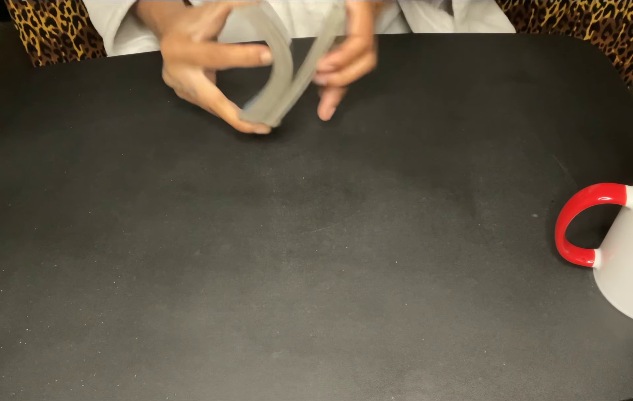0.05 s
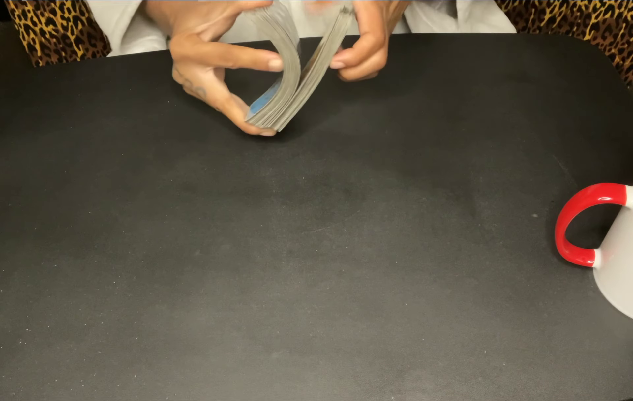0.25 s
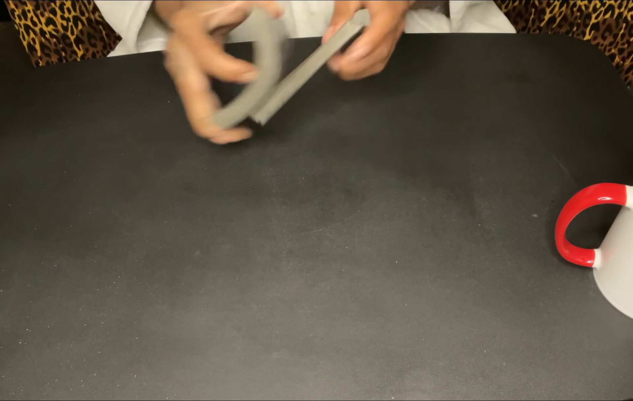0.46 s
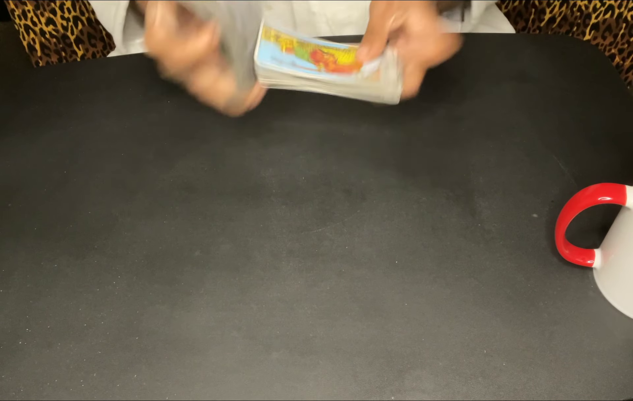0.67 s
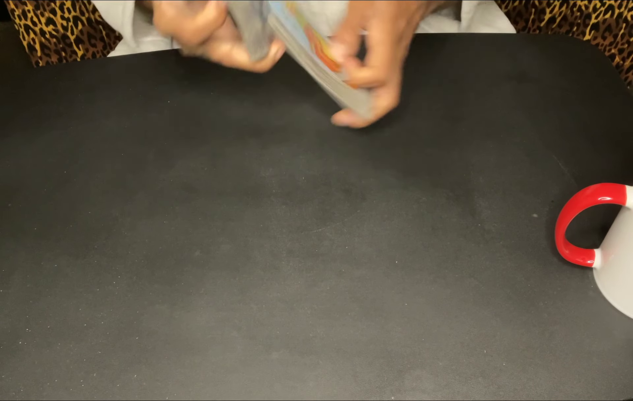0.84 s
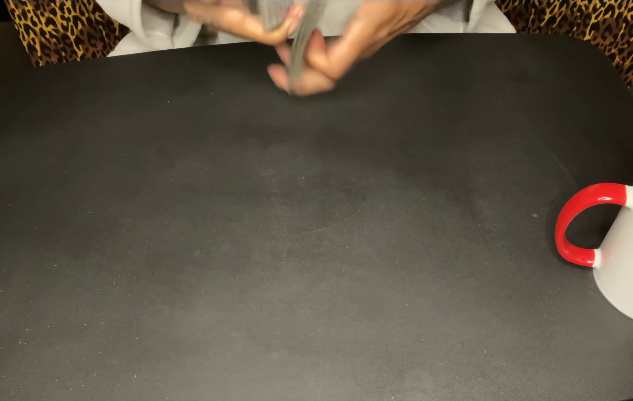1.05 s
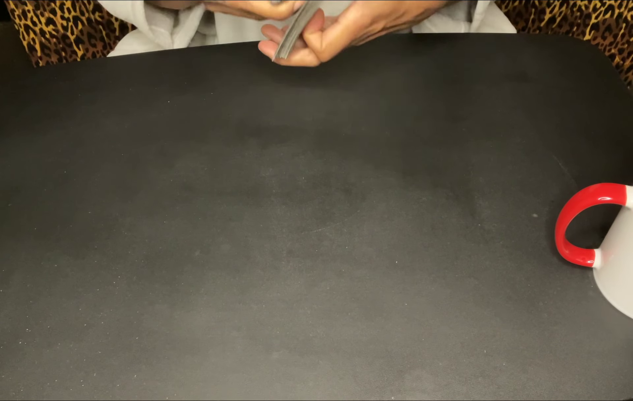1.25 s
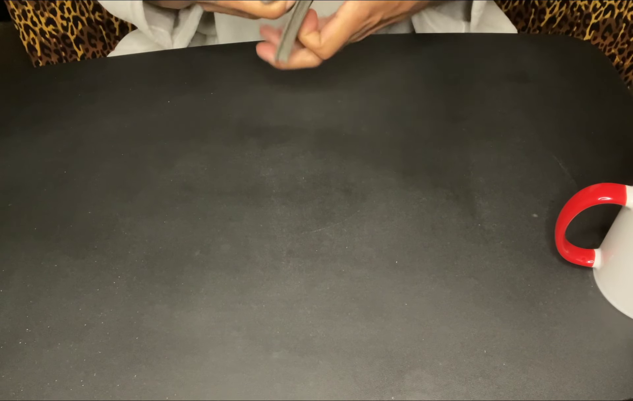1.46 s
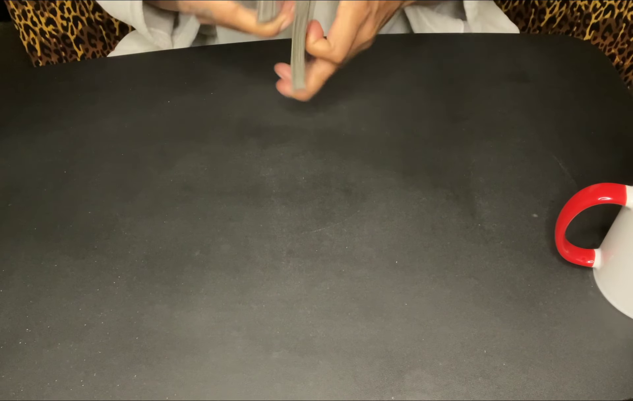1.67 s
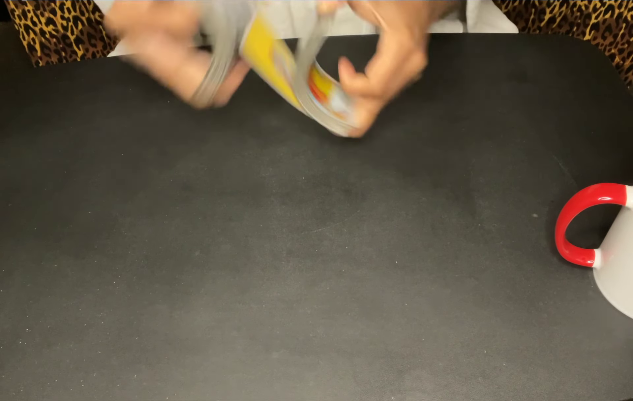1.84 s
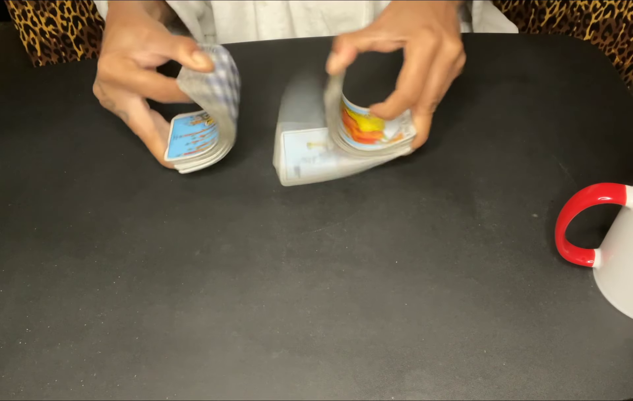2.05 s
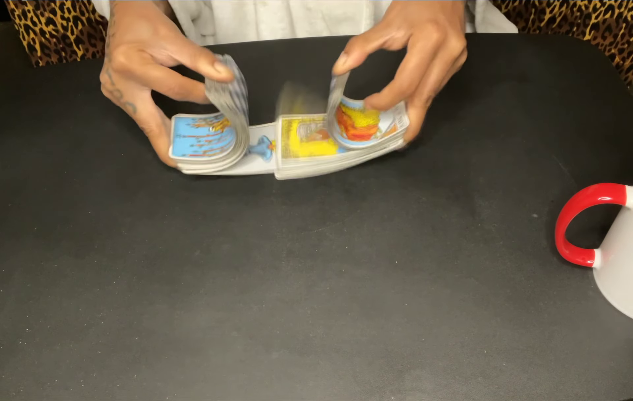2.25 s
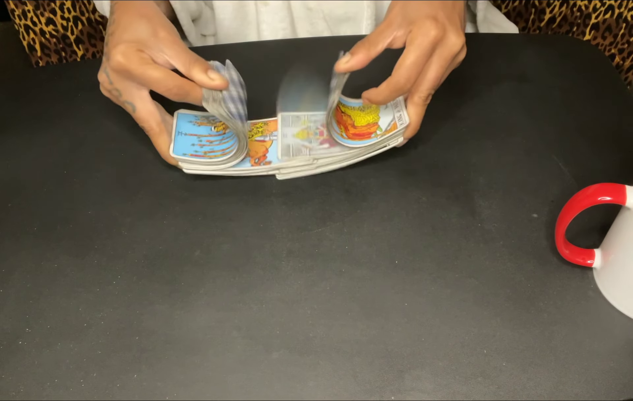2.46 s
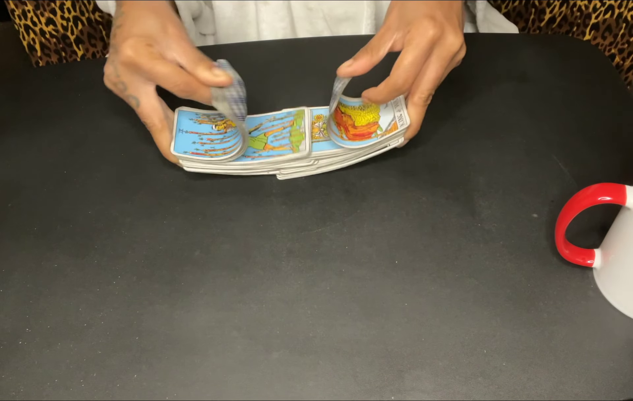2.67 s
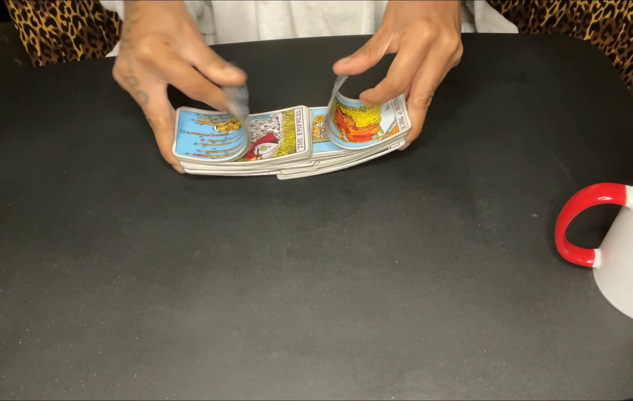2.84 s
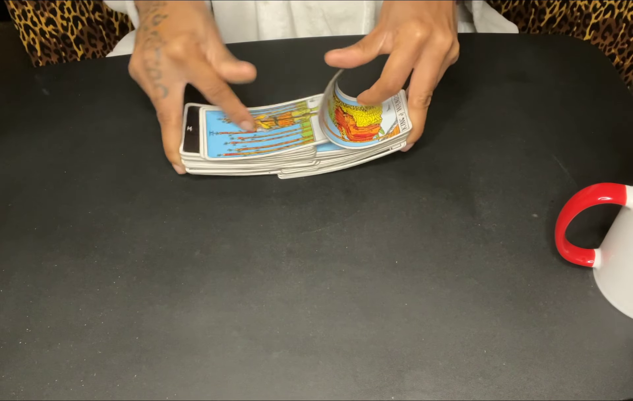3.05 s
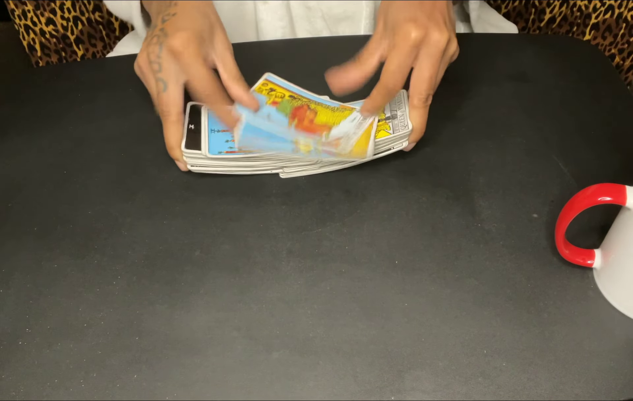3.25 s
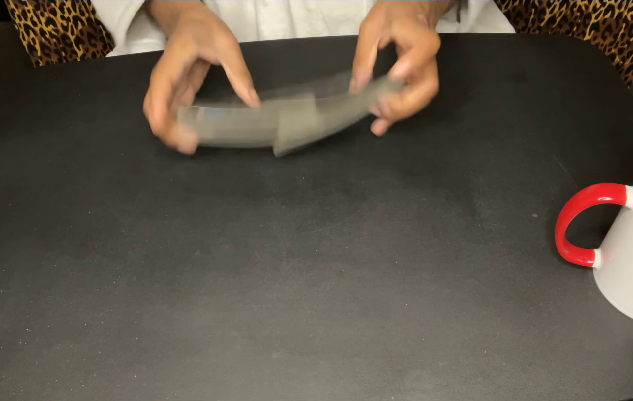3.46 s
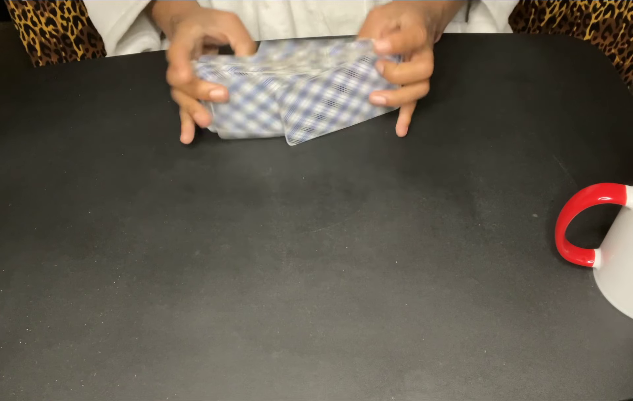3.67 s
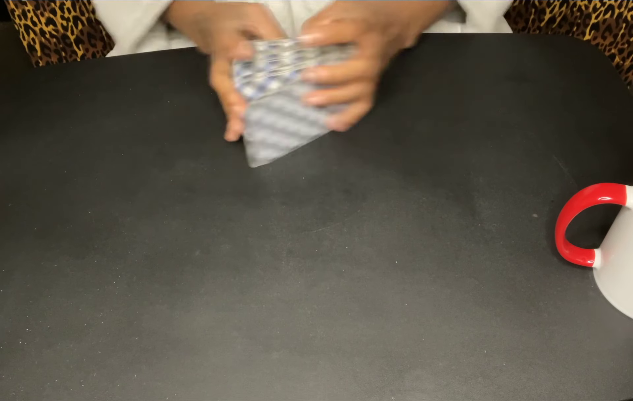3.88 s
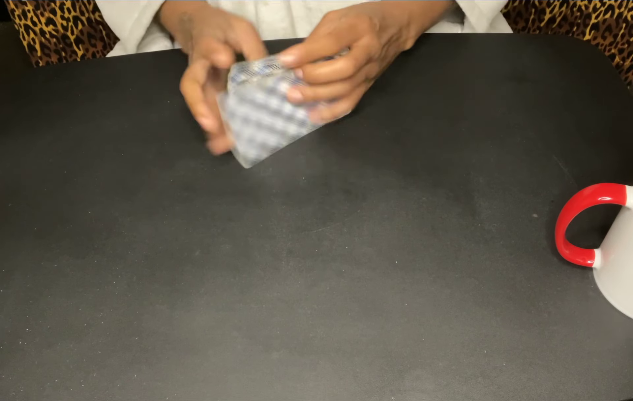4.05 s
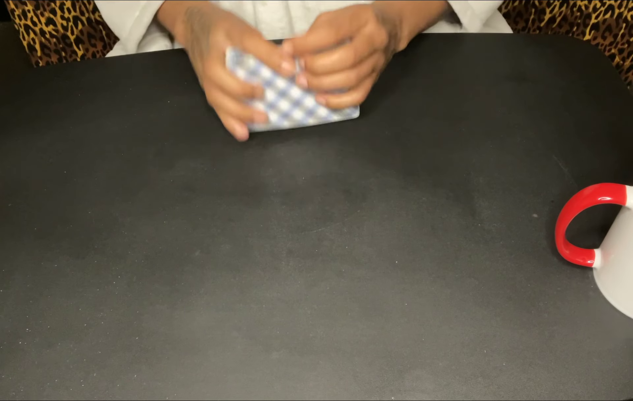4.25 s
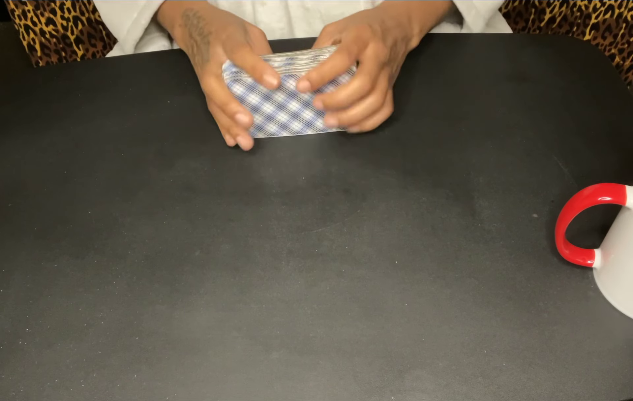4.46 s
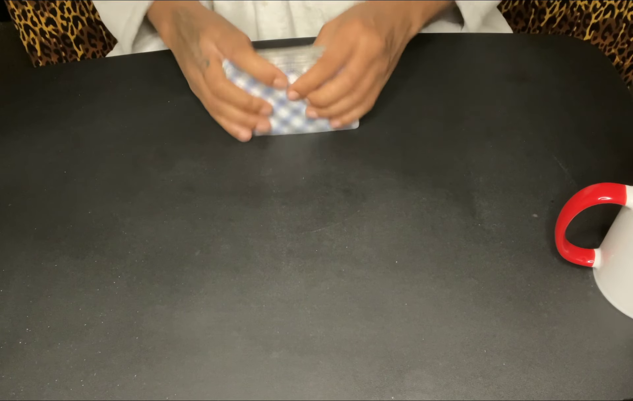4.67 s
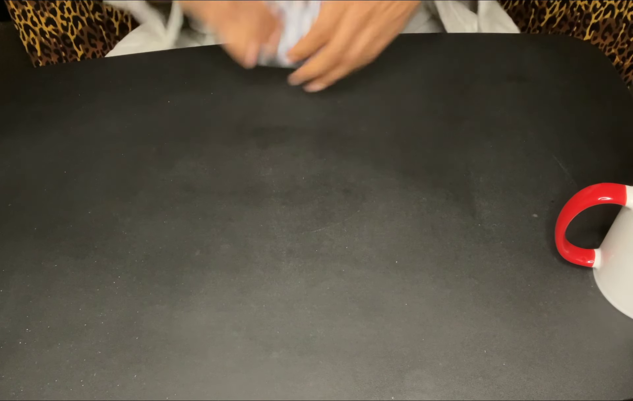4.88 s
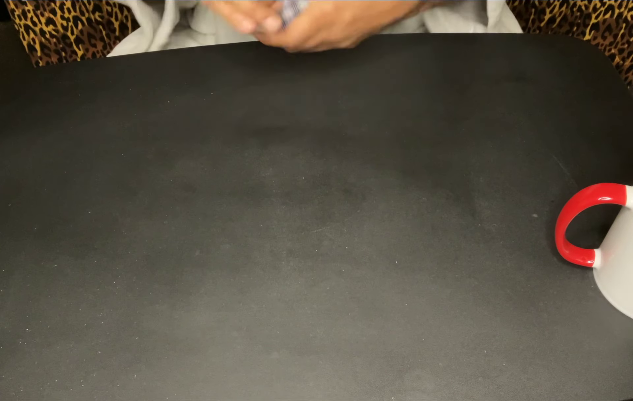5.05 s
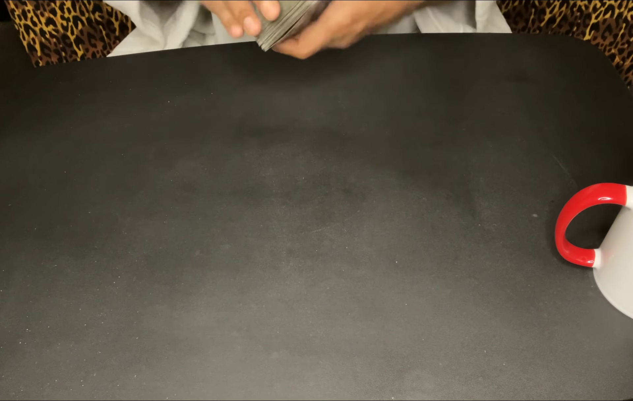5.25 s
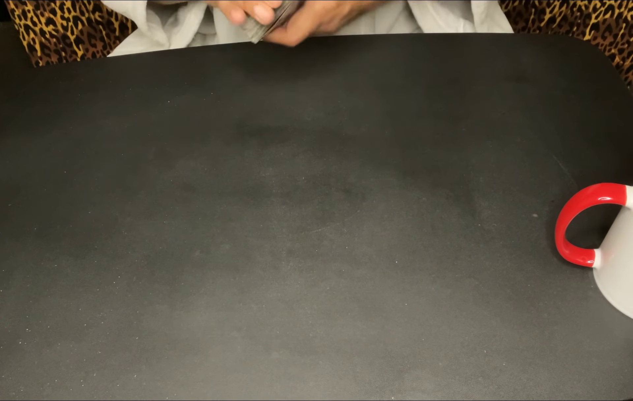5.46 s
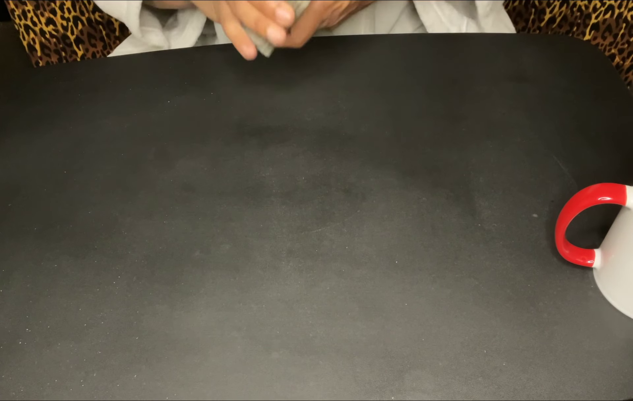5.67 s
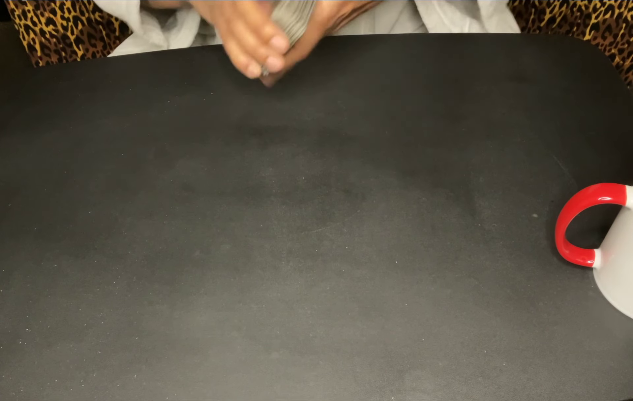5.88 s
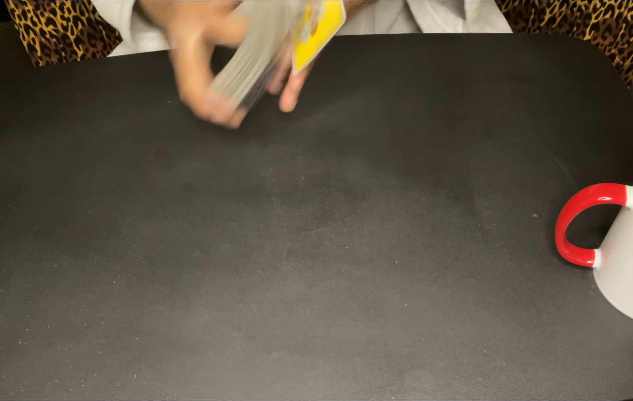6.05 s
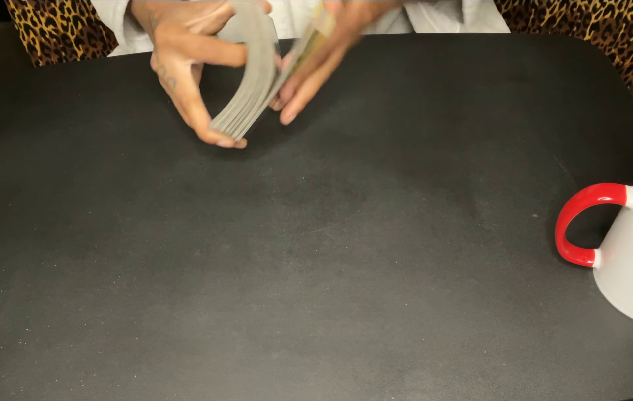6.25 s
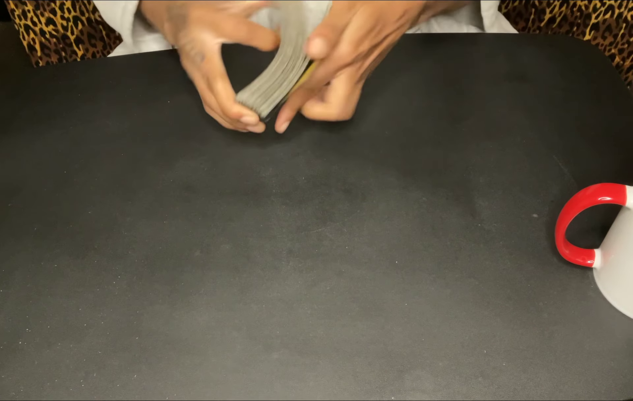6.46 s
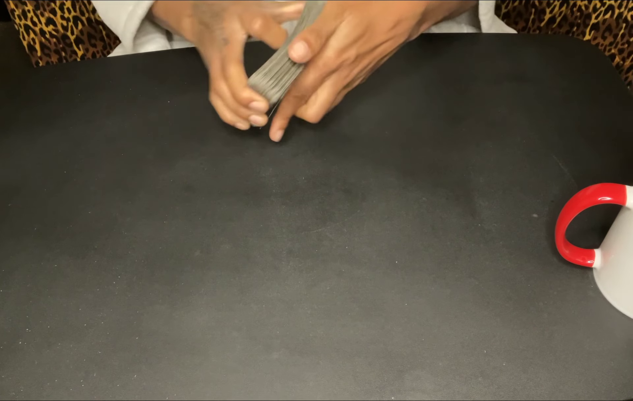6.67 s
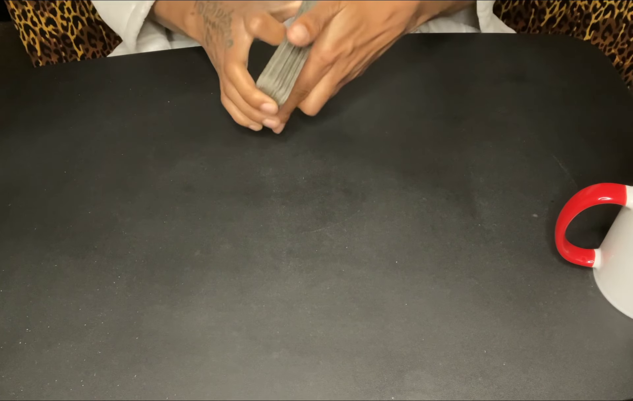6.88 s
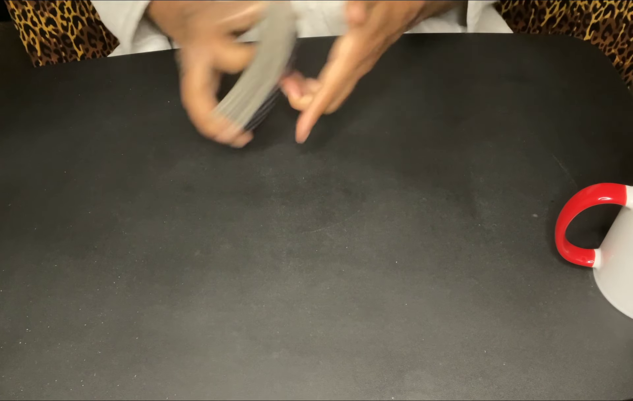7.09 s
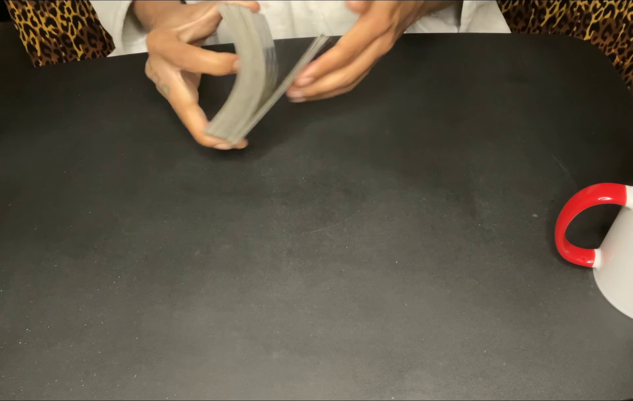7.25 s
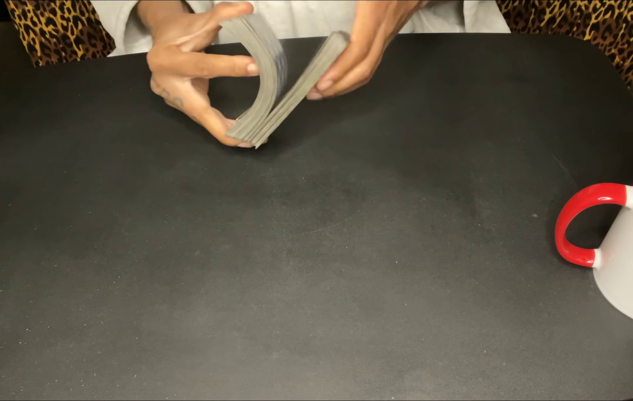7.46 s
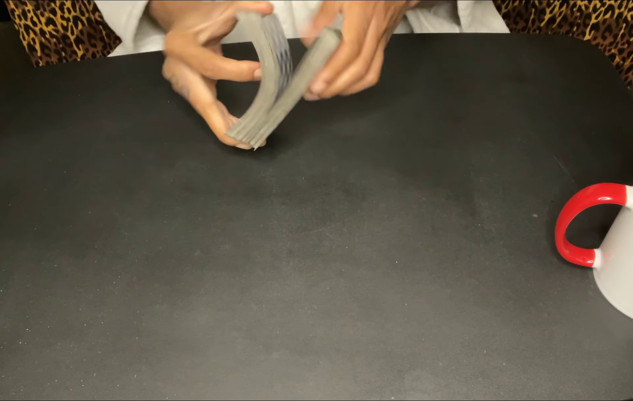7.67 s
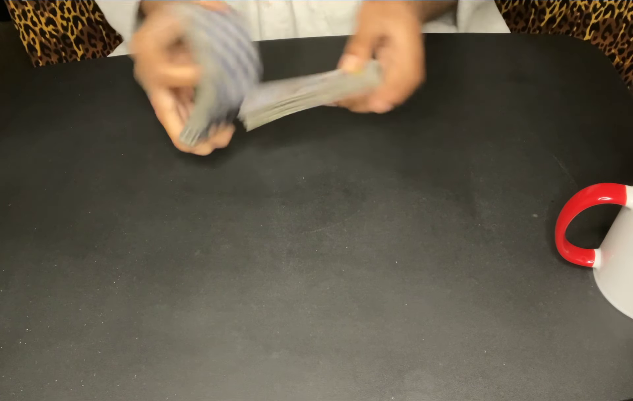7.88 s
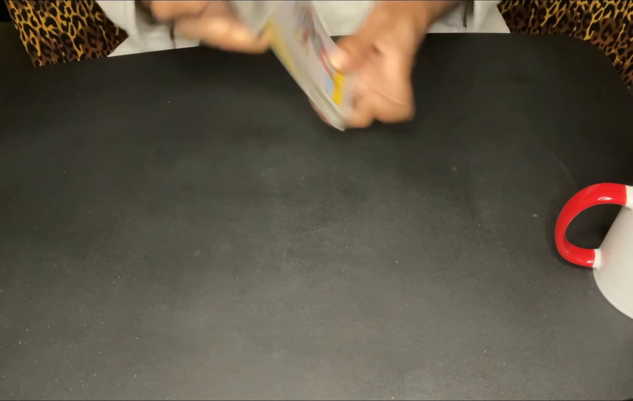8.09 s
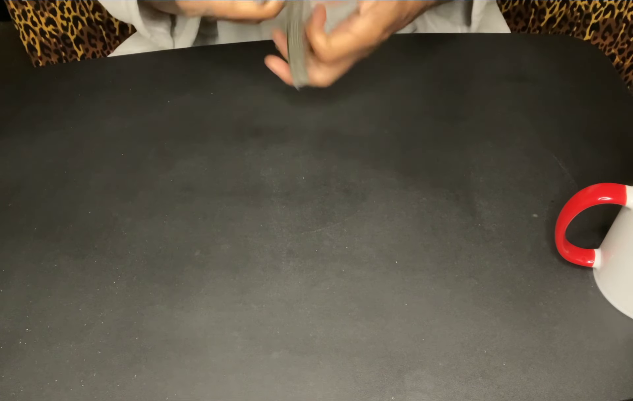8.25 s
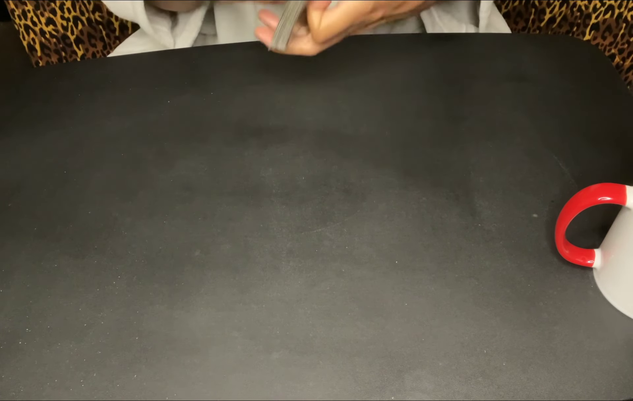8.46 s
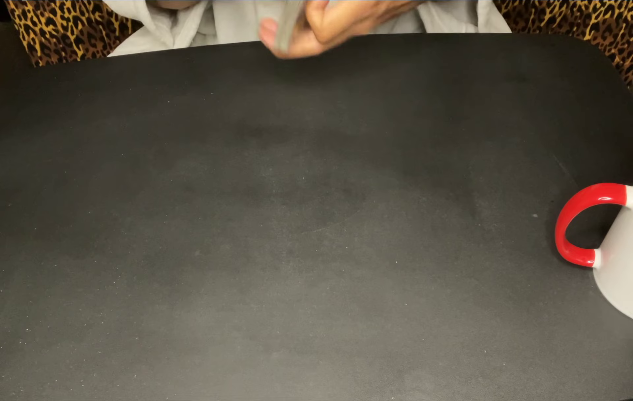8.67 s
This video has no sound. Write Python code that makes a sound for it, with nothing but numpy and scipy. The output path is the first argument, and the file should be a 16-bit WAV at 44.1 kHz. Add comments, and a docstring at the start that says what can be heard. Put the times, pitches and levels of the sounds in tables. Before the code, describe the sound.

Close, nearly centred sound of a large stiff card deck in a small quiet room, over a faint low rush of air and barely audible hum. At 0-0.15 s a few cards flick off the thumb with springy, hollow pops; faint grainy rubbing follows until about 1.8 s. From 2.0 to 3.2 s the halves riffle together in irregular, bright snaps, flat slaps and deep table thumps, loudest and distorted at 2.15-2.8 s, then lighter. At 3.58-3.8 s a bridge collapses in a rapid soft flutter of airy puffs and ticks, with a few stragglers and scraping slides to 4.25 s. At 4.4 s tightly bunched packets knock the table in one dull, ringing thud. Soft slides follow, near quiet from 5 s. Flicks return around 6.1-6.25 s and, in a looser run, 7.2-7.5 s, with hollow pops and crisp ticks. Faint rustling fades near 8.5 s.

```python
"""A deck of large, stiff cards is shuffled just above a table, close to a microphone in a small quiet room.
First the thumb flicks cards into the other hand, each ringing in its bend; faint strokes of grainy friction follow.
The halves riffle together with loud, overloading snaps, slaps and table thumps; a bridge collapses in puffs of air
and ticks, and packets knock square with a ringing thud. Cards slide in the hands, and the deck is split again.
Filtered impulses make the blows, coloured noise the friction and the steady air; faint wavering sines hum below."""
import sys
import numpy as np
from scipy import signal
from scipy.fft import rfft, irfft, next_fast_len
from scipy.io import wavfile
from scipy.ndimage import map_coordinates

SR = 44100
rng = np.random.default_rng(int(sys.argv[2]) if len(sys.argv) > 2 else 0)


def to_wav(sig):
    """Store sig (one row per channel, or 1-D mono) as 16-bit WAV at the path in sys.argv[1].

    Samples outside -1..1 are clipped; the rate is SR.
    """
    pcm = np.clip(np.atleast_2d(sig), -1, 1) * 32767
    pcm = np.round(pcm).astype(np.int16)
    wavfile.write(sys.argv[1], SR, pcm.T)  # frames by channels


N = 384552
SIZE = 16384  # samples in one blow or room response
T = np.arange(SIZE) / SR
HZ = np.fft.rfftfreq(SIZE, 1 / SR)

# cards riffled onto the table, levels as rms over 5 ms; the landing level is the one before cushioning:
# (t/s, ring level/dB, ring f/Hz, ring prominence level/dB, edge crack level/dB, landing level/dB)
RIFFLE_SNAPS = [(2.0153, -27, 4170, 6.5, -35, -29), (2.0552, -36, 741, 12.5, -49, -41),
                (2.0711, -29.5, 2500, 5, -36, -42.5), (2.0737, -17.5, 3400, 2.5, -22.5, -21),
                (2.134, -33, 850, 0.5, -36, -33.5), (2.1521, -7, 1890, 2.5, -24.5, -12),
                (2.178, -36, 2070, 9, -25, -30.5), (2.2017, -5, 2620, 19.5, -14.5, -7.5),
                (2.2674, -14, 2420, 10, -21, -15), (2.274, -8, 4900, 12.5, -13, -7),
                (2.3653, -12, 2004, 15, -13.5, -12), (2.4385, -6.5, 4530, 8.5, -10.5, -26.5),
                (2.4504, -8.5, 1390, 9.5, -10.5, -10), (2.476, -9, 2720, 12.5, -9, -23),
                (2.5141, -13.5, 4770, 12.5, -22, -24.5), (2.5702, -7, 2040, 6.5, -9.5, -16),
                (2.6164, -9.5, 1700, 3, -15.5, -28.5), (2.6275, -17, 4640, 5.5, -29.5, -17.5),
                (2.6677, -9.5, 2260, 5, -12, -11), (2.7735, -29, 2500, 3.5, -35.5, -45.5),
                (2.7782, -9, 1640, 6.5, -34.5, -19), (2.7877, -13, 3300, 7, -16.5, -19.5),
                (2.906, -17, 2940, 0.5, -28.5, -27), (2.9254, -22.5, 765, 27, -27, -29),
                (2.9304, -19, 4730, 11, -39, -27.5), (2.9725, -28, 3420, 7, -28.5, -59),
                (2.9872, -21.5, 3240, 3, -27, -28), (3.0025, -24.5, 6000, 12, -32, -28),
                (3.0212, -25.5, 2700, 2, -26.5, -41), (3.1078, -25.5, 1770, -3, -44, -49),
                (3.1148, -16.5, 3400, 9, -15, -29.5), (3.1369, -27, 2050, 5, -29.5, -43.5),
                (3.197, -32.5, 2460, 12, -36, -59), (3.2078, -34, 3670, 6, -34, -46.5)]
# colour of a card's bend: (f/Hz, level/dB per Hz)
CARD_BEND = [(100, -25.5), (250, -11.5), (500, -6), (900, -0.5), (1600, 5.5), (2500, 4), (3500, 1.5),
             (5000, -8), (8000, -24), (16000, -44)]
# colour of a flat slap: (f/Hz, level/dB per Hz)
SLAP_COLOUR = [(30, -39.5), (100, -17), (250, -6), (450, -1), (700, -3.5), (1100, -17), (3000, -35.5)]
# colour of the thump passed to the table: (f/Hz, level/dB per Hz)
THUMP_COLOUR = [(25, -42), (50, -20.5), (85, -7), (130, -1.5), (200, -7), (280, -10.5), (450, -23),
                (1000, -51)]
CUSHION_DB_PER_S = 4  # the growing pile softens the slap
THUMP_DB, THUMP_DB_PER_S = -8.5, 6  # thump relative to the landing; it grows with the weight of the pile


def riffle():
    """Impact: each card snaps off the thumb, slaps the growing pile and thumps the table under it."""
    out = np.zeros((2, N))
    for s, ring_db, hz, lift_db, crack_db, landing_db in RIFFLE_SNAPS:
        elapsed = s - RIFFLE_SNAPS[0][0]
        slap_gain = amp(landing_db - CUSHION_DB_PER_S * elapsed)
        slap = slap_gain * contact(along(SLAP_COLOUR, HZ), t60=0.051, chatter=0.92)
        push = contact(along(THUMP_COLOUR, HZ), t60=0.11, chatter=1.4)
        thump_gain = amp(landing_db + THUMP_DB + THUMP_DB_PER_S * elapsed)
        thump = thump_gain * (push + amp(-0.5) * table_ring())
        release = snap(CARD_BEND, ring_db, hz, lift_db, crack_db)
        # the card hits the pile moving opposite to its first flick
        near, spread = release - slap + thump
        add(out, s, in_room(near, spread, wet_db=-8))
    return out


# cards flicked into the other hand as the deck is split:
# (t/s, ring level/dB, ring f/Hz, edge crack level/dB)
SPLIT_FLICKS = [(0.0054, -30, 920, -40.5), (0.03, -30, 870, -39), (0.0445, -30, 850, -50),
                (0.0625, -33, 756, -47), (0.0733, -16.5, 1010, -43), (0.1545, -13.5, 1670, -25.5),
                (0.7034, -54, 4500, -56), (1.787, -44.5, 866, -52), (1.9914, -39, 1250, -51.5),
                (6.0853, -43, 2980, -49), (6.1643, -27.5, 2510, -29.5), (6.1716, -25, 1037, -32),
                (6.2234, -49, 1216, -38.5), (6.2364, -47, 1600, -46), (6.5306, -47.5, 5000, -57),
                (7.2246, -41, 1050, -50), (7.2368, -31.5, 750, -41), (7.3126, -33, 3700, -42),
                (7.3399, -26.5, 785, -39.5), (7.3614, -31, 767, -52), (7.3728, -27, 790, -51),
                (7.3774, -34, 857, -41), (7.393, -27, 3500, -38.5), (7.4582, -19.5, 2570, -32),
                (7.4722, -32.5, 2494, -55), (7.5047, -33, 743, -44), (7.524, -27, 780, -44),
                (8.0111, -46, 914, -51.5)]
# ring of a card bent along its length: (f/Hz, level/dB per Hz)
LENGTHWISE_BEND = [(100, -29), (300, -11.5), (600, -1.5), (900, 3), (1300, -2.5), (2000, 0.5), (2750, -0.5),
                   (3300, -4), (5000, -12), (8000, -24), (16000, -37.5)]
SPLIT_LIFT_DB = 6  # how far that ring stands out at its own pitch
# pop of the cupped palm: pitch (Hz), level under a medium flick (dB), dB per dB of flick
PALM_HZ, PALM_DB, PALM_GROWS = 790, -36.5, 0.61
MEDIUM_DB = -30  # ring level of a medium flick


def splitting():
    """Cavity resonance: cards snap off the thumb into a cupped palm, which gives a hollow pop."""
    out = np.zeros((2, N))
    for s, ring_db, hz, crack_db in SPLIT_FLICKS:
        pop_colour = along(SLAP_COLOUR, HZ) + resonance(PALM_HZ, q=4.8, lift_db=11)
        pop = contact(pop_colour, t60=0.014, chatter=1.0)
        palm = amp(PALM_DB + PALM_GROWS * (ring_db - MEDIUM_DB)) * pop
        near, spread = snap(LENGTHWISE_BEND, ring_db, hz, SPLIT_LIFT_DB, crack_db) + palm
        add(out, s, in_room(near, spread, wet_db=-8.5))
    return out


# colour of a cracking card edge: (f/Hz, level/dB per Hz)
EDGE_CRACK = [(1500, -22), (3500, 1.5), (5000, 4.5), (8000, -1.5), (12000, -6), (16000, -16)]
# a freed card pulls a few neighbours after it: latest delay (s), greatest level (dB)
FOLLOW_S, FOLLOW_DB = 0.035, -20


def snap(bend, ring_db, hz, lift_db, crack_db, count=3):
    """Elastic release: a freed card cracks at its edge and rings in its bend; its neighbours slip after it."""
    ring_colour = along(bend, HZ) + resonance(hz, q=2.7, lift_db=lift_db)
    ring = amp(ring_db) * contact(ring_colour, t60=0.02, chatter=0.78)
    crack = amp(crack_db) * contact(along(EDGE_CRACK, HZ), t60=0.0079, chatter=6.5)
    sound = ring + crack
    for delay, size in rng.random((count, 2)):
        add(sound, FOLLOW_S * delay, amp(FOLLOW_DB) * size * (ring + crack))
    return sound


# modes of the table top: (f/Hz, level/dB, decay t60/s)
TABLE_MODES = [(86, -11, .25), (136, 3.5, 0.23), (166, -7.5, 0.2), (255, -9.5, 0.2), (313, -9.5, 0.31),
               (414, 4, 0.083), (487, -2, 0.34), (600, 1, 0.16), (737, -11, 0.089), (806, -4.5, .18)]


def table_ring(spread_db=2):
    """Modal superposition: the table's decaying modes add up, at new strengths for each blow."""
    hz, db, t60 = np.transpose(TABLE_MODES)[:, :, None]
    strength_db = db + spread_db * rng.standard_normal(db.shape)
    modes = amp(strength_db - 60 * T / t60) * np.sin(2 * np.pi * hz * T)
    return blow(np.sum(modes, 0))


# bent cards falling flat onto each other: (t/s, air puff level/dB, puff f/Hz)
FLAT_FALLS = [(3.5774, -21.5, 396), (3.5914, -17.5, 379), (3.6245, -18, 600), (3.6407, -17, 910),
              (3.6563, -18, 587), (3.6612, -23.5, 920), (3.6783, -14, 406), (3.6833, -19.5, 624),
              (3.7058, -22.5, 710), (3.7222, -19.5, 750), (3.7324, -20.5, 840), (3.7794, -27, 470),
              (3.9739, -31.5, 493), (3.9835, -28.5, 1740), (4.1962, -30, 416), (4.2104, -32, 280),
              (4.2471, -42, 477)]
# colour of the escaping air: (f/Hz, level/dB per Hz)
PUFF_COLOUR = [(50, -8), (150, 1), (350, 5.5), (800, 0), (1400, 0.5), (2300, -23), (6000, -56)]
# colour of card edges ticking and scraping: (f/Hz, level/dB per Hz)
EDGE_COLOUR = [(500, -38.5), (1200, 7), (2200, 4.5), (3200, 1), (3650, 6), (4100, -1.5), (6000, -11),
               (9000, -23), (16000, -38)]
# the edges tick hardest midway through the collapse, then more softly: (t/s, tick level/dB relative to the puff)
COLLAPSE_TICKS = [(3.6, -25), (3.655, -11), (3.69, -1.5), (3.8, -11)]


def bridge():
    """Air displacement: cards drop flat and squeeze out puffs of air; their edges tick."""
    out = np.zeros((2, N))
    for s, puff_db, hz in FLAT_FALLS:
        puff_colour = along(PUFF_COLOUR, HZ) + resonance(hz, q=2.0, lift_db=16.0)
        puff = amp(puff_db) * contact(puff_colour, t60=0.029, chatter=1.0)
        tick_db = puff_db + np.interp(s, *np.transpose(COLLAPSE_TICKS))
        tick = amp(tick_db) * contact(along(EDGE_COLOUR, HZ), t60=0.024, chatter=6.7)
        near, spread = puff + tick
        add(out, s, in_room(near, spread, wet_db=-5.5))
    return out


# packets of the deck landing edge-on on the table: (t/s, thud level/dB, edge clack level/dB)
PACKET_KNOCKS = [(4.3898, -13.5, -32), (4.3926, -12, -25.5), (4.3949, -18, -30), (4.3997, -16.5, -41),
                 (4.4043, -17.5, -27), (4.414, -43.5, -28)]
# colour of the thud: (f/Hz, level/dB per Hz)
THUD_COLOUR = [(30, -40), (70, -5), (140, 3), (260, 5), (410, -5), (600, -5), (800, -7), (1300, -6.5),
               (2200, -42), (5000, -39)]


def squaring_knock(table_db=-17):
    """Impulse excitation: the deck lands on its edge in packets; the first sets the table ringing."""
    out = np.zeros((2, N))
    for s, thud_db, clack_db in PACKET_KNOCKS:
        thud_colour = along(THUD_COLOUR, HZ) + resonance(417, q=2.5, lift_db=12)
        thud = amp(thud_db) * contact(thud_colour, t60=0.017, chatter=1.0)
        clack = amp(clack_db) * contact(along(EDGE_COLOUR, HZ), t60=0.029, chatter=3.8)
        near, spread = thud + clack
        add(out, s, in_room(near, spread, wet_db=-7.5))
    ring = amp(table_db) * table_ring()
    add(out, PACKET_KNOCKS[0][0], in_room(ring, ring, wet_db=-7.0))
    return out


# cards sliding lightly in the hands: (middle t/s, half length t/s, rub level/dB, hiss level/dB)
HAND_STROKES = [(0.47, 0.13, -66.5, -67), (0.711, 0.0091, -48, -69), (0.791, 0.0063, -55, -52),
                (0.823, 0.025, -55, -60), (0.96, 0.31, -66, -69.5), (1.405, 0.042, -64, -72),
                (1.83, 0.098, -60, -67.5), (3.35, 0.01, -52.5, -64), (3.52, 0.069, -60.5, -67),
                (3.865, 0.062, -43.5, -56), (4.633, 0.0017, -53.5, -57), (4.742, 0.029, -49.5, -73),
                (4.992, 0.009, -60, -57), (5.02, 0.13, -67.5, -68), (5.693, 0.003, -55, -63),
                (5.98, 0.065, -57, -61.5), (6.37, 0.054, -60, -63.5), (6.55, 0.15, -66.5, -75),
                (7.1, 0.1, -71.5, -79), (7.83, 0.074, -61, -60.5), (8.05, 0.14, -65, -67),
                (8.414, 0.028, -69.5, -59)]
# the woven halves pushed together: (middle t/s, half length t/s, air and table level/dB, edge scrape level/dB)
HALVES_PUSHED = [(3.64, 0.029, -26, -58), (3.73, 0.18, -40, -48.5), (3.88, 0.077, -35.5, -46),
                 (4.0, 0.027, -37, -51), (4.088, 0.017, -40, -35), (4.12, 0.092, -39.5, -49),
                 (4.22, 0.046, -44.5, -47), (4.735, 0.04, -43, -55.5)]
# colour of face rubbing on face: (f/Hz, level/dB per Hz)
RUB_COLOUR = [(300, -13.5), (800, -1), (2400, -1), (5000, -2), (8000, -12.5), (16000, -27)]
# colour of the faces' hiss: (f/Hz, level/dB per Hz)
HISS_COLOUR = [(2500, -17.5), (6000, -6), (9000, -3), (13000, -7), (16000, -14)]
# colour of the air pressed out between the halves, with the table humming along near 138 Hz:
# (f/Hz, level/dB per Hz)
AIR_AND_TABLE_COLOUR = [(50, -11), (105, -8), (138, 10), (180, -2), (300, 0.5), (550, 4), (1000, -3.5),
                        (1800, -40), (4000, -39)]
# the card edges sing faintly as they rub past each other: (f/Hz, level/dB per Hz)
SONG_COLOUR = [(2000, -51), (3350, -7), (3620, 9), (3900, -39), (6000, -50.5)]
PUSH_HISS_DB = -17  # hiss of the faces, relative to the scrape
# edges drag past the thumb around each snap: half length (s), level relative to the crack (dB)
DRAG_S, RIFFLE_DRAG_DB, SPLIT_DRAG_DB = 0.046, -27.5, -21.5
# the edge grates just before it lets go: how early (s), level relative to the crack (dB)
LEAD_S, LEAD_DB = 0.002, -20


def sliding(song_db=-13):
    """Stick-slip friction: grainy noise of cards and edges, with escaping air and the table humming along."""
    rub, hiss = swells(HAND_STROKES)
    air, scrape = swells(HALVES_PUSHED)
    drags = []
    for s, *_, crack_db, _ in RIFFLE_SNAPS:
        drags.append((s, DRAG_S, crack_db + RIFFLE_DRAG_DB))
        drags.append((s - LEAD_S, LEAD_S, crack_db + LEAD_DB))
    for s, *_, crack_db in SPLIT_FLICKS:
        drags.append((s, DRAG_S, crack_db + SPLIT_DRAG_DB))
    drag, = swells(drags)
    all_hiss = np.hypot(hiss, amp(PUSH_HISS_DB) * scrape)
    light = rub * noise(RUB_COLOUR, grain_db=3.5) + all_hiss * noise(HISS_COLOUR, grain_db=2.0)
    song = amp(song_db + 2.9 * wobble(25)) * noise(SONG_COLOUR)
    edges = scrape * (noise(EDGE_COLOUR, grain_db=3.0) + song)
    firm = air * noise(AIR_AND_TABLE_COLOUR, grain_db=2) + edges
    friction = light * amp(4.4 * wobble(45)) + firm + drag * noise(EDGE_CRACK, grain_db=6.5)
    return in_room(friction, friction, wet_db=-14)[:, :N]


# colour of the steady rush of air: (f/Hz, level/dB per Hz)
RUSH_COLOUR = [(25, -11.5), (55, -6.5), (90, -10), (120, -8.5), (200, -7), (380, -6), (600, -14),
               (900, -15), (1600, -22.5), (3000, -29), (5200, -30.5), (7000, -34.5), (16000, -37.5)]
# faint hum in the room, rms levels: (f/Hz, level/dB)
HUM_TONES = [(269, -70), (301.5, -74.5), (365, -68.5), (463, -70)]
# a faint low rumble early on: (middle t/s, half length t/s, level/dB)
RUMBLE_SWELL = [(.85, 0.55, -64)]
# colour of the rumble: (f/Hz, level/dB per Hz)
RUMBLE_SPECTRUM = [(25, -13), (50, -1.5), (58, -1), (75, -9), (150, -36), (500, -72)]


def room_tone(level_db=-57.5, side_db=-13):
    """Stationary noise: a steady low rush of air, with a faint phase-wavering hum and a passing rumble."""
    t = np.arange(N) / SR
    hum = np.zeros(N)
    for hz, db in HUM_TONES:
        phase = 2 * np.pi * hz * t + 2.9 * wobble(7.4)
        hum += amp(db) * np.sqrt(2) * np.sin(phase)
    mid = noise(RUSH_COLOUR)
    side = amp(side_db) * noise(RUSH_COLOUR)
    rush = amp(level_db) * np.array([mid + side, mid - side])
    rumble, = swells(RUMBLE_SWELL)
    return rush + hum + rumble * noise(RUMBLE_SPECTRUM)


# decay of the room: (f/Hz, t60/s)
WALL_DECAY = [(100, 0.3), (300, 0.2), (800, 0.29), (2000, .23), (5000, 0.28), (14000, 0.15)]
# nearest reflecting surfaces: (delay t/s, level/dB)
NEAR_ECHOES = [(.0033, -22.5), (0.0099, -15.5)]
# side to mid ratio of the room's answer: (f/Hz, ratio)
ROOM_WIDTH = [(40, .25), (130, .07), (500, .25), (2000, .25), (4000, 0.21), (9000, .34)]


def in_room(near, spread, wet_db, linger_db=-16, linger=2.9):
    """Reverberation: direct sound, two reflections and a short tail differing slightly between the ears."""
    hz, t, z = signal.stft(rng.standard_normal((2, SIZE)), SR, nperseg=256)
    z[1] *= along(ROOM_WIDTH, hz)[:, None]
    fall_db = -60 * t / along(WALL_DECAY, hz)[:, None]
    # a weak part of the tail, running between bare walls, lasts longer
    decay = np.hypot(amp(fall_db), amp(linger_db + fall_db / linger))
    tail = signal.istft(z * decay, SR, nperseg=256)[1][:, :SIZE]
    mid, side = tail * (1 - np.exp(-T / 0.0039))  # the tail builds up over a few ms
    response = amp(wet_db) * np.array([mid + side, mid - side]) / np.linalg.norm(mid)
    out = signal.fftconvolve(spread[None], response, axes=1)
    add(out, 0, near)
    for delay, db in NEAR_ECHOES:
        add(out, delay, amp(db) * near)
    return out


def contact(colour_db, t60, chatter):
    """Source and filter: a push plus brief chatter, as heard nearby; the push alone, as spread into the room."""
    # folding the cepstrum makes the colour causal (minimum phase)
    cepstrum = irfft(np.log(amp(colour_db)))
    cepstrum[1:SIZE // 2] *= 2
    cepstrum[SIZE // 2 + 1:] = 0
    colour = np.exp(rfft(cepstrum))
    force = rng.standard_normal(SIZE) * amp(-60 * T / t60)
    force *= chatter / np.linalg.norm(force)
    force[0] += 1
    return np.array([blow(irfft(rfft(force) * colour)), blow(irfft(colour))])


def resonance(hz, q, lift_db):
    """Resonance: dB curve of one peak standing lift_db above its surroundings."""
    return lift_db / (1 + (q * (HZ / hz - hz / (HZ + 1))) ** 2)


def swells(rows):
    """Envelope: one gain curve per dB column; each (middle s, half length s, dB, ..) row rises and falls."""
    t = np.arange(N) / SR
    power = np.zeros((len(rows[0]) - 2, N))
    for s, half, *levels in rows:
        during = np.abs(t - s) < 3 * half
        bell = np.exp(-((t[during] - s) / half) ** 2)
        power[:, during] += (amp(levels)[:, None] * bell) ** 2
    return np.sqrt(power)


def noise(spectrum, grain_db=0):
    """Spectral shaping: coloured noise of rms 1; grain_db clumps it into tiny catches and slips."""
    grains = rng.standard_normal(N) * amp(grain_db * wobble(900))
    return unit(filtered(grains, lambda hz: amp(along(spectrum, hz))))


def wobble(rate):
    """Random modulation: a smooth random curve, rate knots a second."""
    knots = rng.standard_normal(int(N * rate / SR) + 4)
    return map_coordinates(knots, [np.arange(N) * rate / SR])


def filtered(x, response):
    """Linear filtering: x times a response of frequency."""
    m = next_fast_len(N + SIZE)
    return irfft(rfft(x, m) * response(np.fft.rfftfreq(m, 1 / SR)), m)[..., :N]


def along(points, hz):
    """Logarithmic pitch: interpolate (Hz, value) points on a log axis."""
    f, v = np.transpose(points)
    return np.interp(np.log(hz + 1), np.log(f + 1), v)


def amp(db):
    """Level: decibels to gain."""
    return 10 ** (np.asarray(db) / 20)


def unit(x):
    """Mean power: scale to rms 1."""
    return x / np.sqrt(np.mean(x ** 2) + 1e-20)


def blow(x):
    """Energy: scale to that of 5 ms at rms 1."""
    return x / np.linalg.norm(x) * np.sqrt(.005 * SR)


def add(track, s, sound):
    """Superposition: mix a sound in at time s."""
    part = track[..., max(round(s * SR), 0):][..., :sound.shape[-1]]
    part += sound[..., :part.shape[-1]]


# lean of the cards between the microphones: (f/Hz, left over right level/dB)
CARD_LEAN = [(150, -0.05), (700, -1), (3000, -0.26), (8000, 0.24)]


def scene():
    """Level difference: the cards stay near the middle, and the room's sound leans right by 1.2 dB."""
    cards = riffle() + splitting() + bridge() + squaring_knock() + sliding()
    halves = np.array([[.5], [-.5]])  # left up, right down
    heard = filtered(cards, lambda hz: amp(along(CARD_LEAN, hz) * halves))
    return heard + room_tone() * amp([[-.6], [.6]])


TOP_HZ = 15900  # band limit


def record(dry, low_cut_hz=56):
    """Overload and band limiting: clips at full scale, thins the deepest bass and cuts above the band limit."""
    clipped = np.clip(dry, -1, 1)
    thinned = filtered(clipped, lambda hz: hz ** 2 / np.hypot(hz ** 2, low_cut_hz ** 2))
    return filtered(thinned, lambda hz: 1 / np.sqrt(1 + (hz / TOP_HZ) ** 120))


dry = scene()
out = record(dry)
to_wav(out)
```